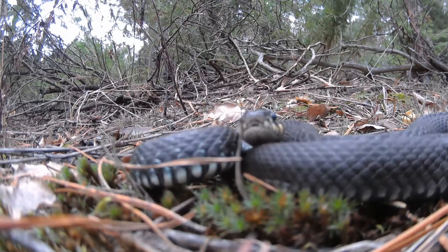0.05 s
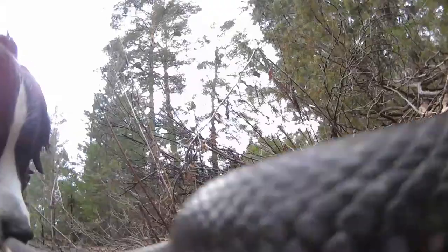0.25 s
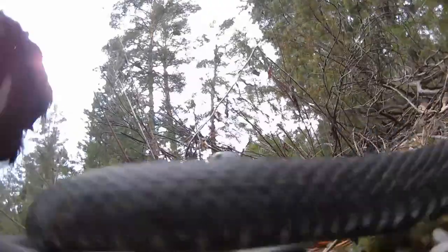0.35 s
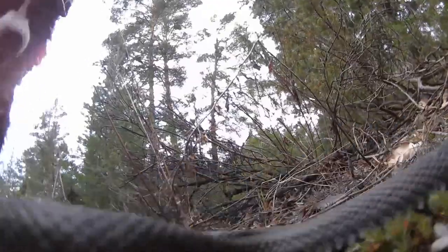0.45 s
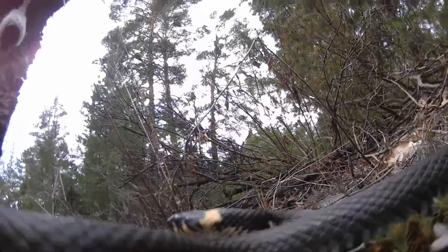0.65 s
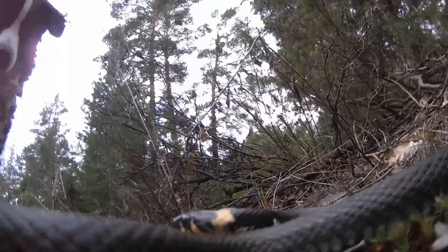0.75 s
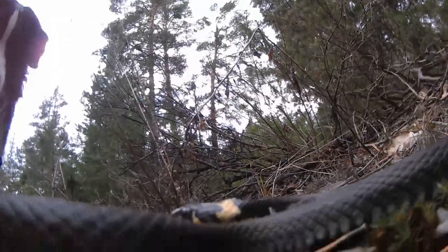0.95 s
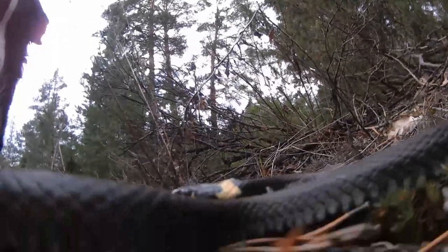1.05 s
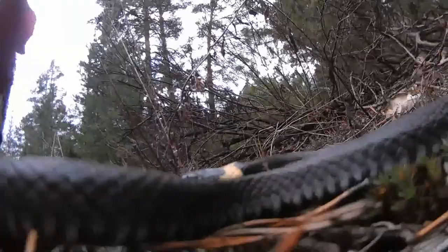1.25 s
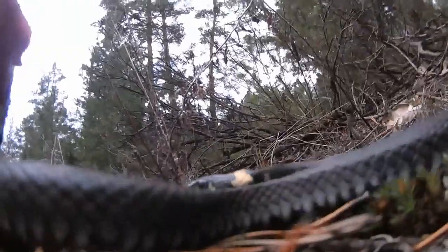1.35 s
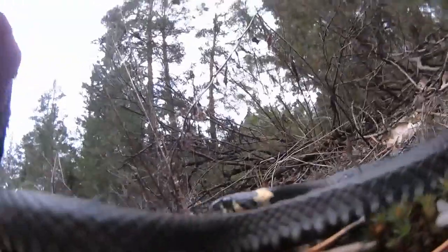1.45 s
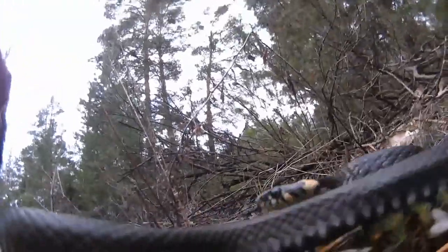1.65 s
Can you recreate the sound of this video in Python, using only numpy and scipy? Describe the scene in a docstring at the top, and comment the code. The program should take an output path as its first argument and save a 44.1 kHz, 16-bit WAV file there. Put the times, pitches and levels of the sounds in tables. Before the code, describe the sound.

A snake suddenly brushes against a microphone lying on the ground in a quiet forest, with a rasping scrape, bumps and a rumble. Softer slithering follows, with small snaps of dry needles, one light knock and a fading hiss.

```python
"""Quiet forest air. Then, abruptly, a snake is heard lunging past a small camera on the ground:
its scales scrape the case and its weight makes a low rumble, while a soft hiss from its throat and
the rub of its belly start underneath. The case is knocked several times and judders once.
As the scrape dies away, the snake slides on over dry needles, which crackle and now and then snap.
One more light knock comes midway, and the long hiss rises in pitch and fades."""
import sys
import numpy as np
from scipy import signal
from scipy.fft import rfft, irfft
from scipy.io import wavfile

SR = 44100
rng = np.random.default_rng(int(sys.argv[2]) if len(sys.argv) > 2 else 0)


def transcribe(signal):
    """Save signal, clipped to [-1, 1], as a 16-bit WAV file at the path in sys.argv[1]."""
    frames = np.atleast_2d(signal).T
    limited = np.clip(frames, -1, 1)
    pcm = np.round(limited * 32767).astype(np.int16)
    wavfile.write(sys.argv[1], SR, pcm)


N = 74970  # 1.7 s

# tone of the forest air: f/Hz, level/dB
AIR_TONE = [(20, 12.5), (45, -0.5), (100, -2), (180, -3.5), (280, -7.5), (380, -11), (550, -9.5),
            (750, -15), (1000, -16), (1250, -24.5), (1800, -28.5), (4000, -33), (8000, -37)]
# scales scraping the case: t/s, rasp level/dB, sizzle level/dB
SCRAPE_LEVELS = [(0.231, -42, -49.5), (0.243, -43, -46), (0.262, -40.5, -55), (0.28, -36.5, -52),
                 (0.296, -26.5, -42), (0.322, -33.5, -49.5), (0.345, -44.5, -52.5), (0.38, -40.5, -54.5),
                 (0.41, -49.5, -59), (0.46, -64.5, -78)]
# tone of the scrape's low rasp: f/Hz, level/dB
RASP_TONE = [(30, -10), (90, 0), (250, 3.5), (450, 0.5), (720, -4), (1050, -5), (1600, -7), (2100, -19),
             (3000, -39), (8000, -51.5)]
# tone of the scrape's high sizzle: f/Hz, level/dB
SIZZLE_TONE = [(800, -13.5), (1800, -8.5), (2500, 2), (3100, -2), (3900, -1.5), (4700, -10.5),
               (6000, -15.5), (8000, -22.5)]
# the body pushing on the case: t/s, level/dB
PUSH_LEVELS = [(0.231, -41.5), (0.255, -37), (0.28, -37), (0.32, -35.5), (0.36, -42.5), (0.41, -45),
               (0.47, -53), (0.56, -57), (0.66, -53.5), (0.75, -51.5), (0.87, -53), (0.95, -49), (1.0, -48),
               (1.11, -49), (1.16, -56), (1.26, -60), (1.32, -65), (1.45, -70), (1.53, -57), (1.59, -56),
               (1.645, -49), (1.7, -54)]
# tone of that push: f/Hz, level/dB
RUMBLE_TONE = [(20, -7), (40, -1), (70, 1.5), (130, 2.5), (200, -16), (350, -22), (1000, -56)]
# the hiss and the pitch the throat rings at: t/s, level/dB, f/Hz
HISS_SHAPE = [(0.33, -55.5, 1700), (0.48, -55.5, 1660), (0.68, -61, 1820), (0.82, -56.5, 1766),
              (0.93, -58, 1870), (1.1, -58, 1940), (1.17, -55.5, 2020), (1.23, -59, 2110), (1.3, -63, 2290),
              (1.39, -71, 2570), (1.46, -72.5, 2710)]
# sliding over needles: t/s, relative rub level/dB, relative crackle level/dB
SLIDE_LEVELS = [(0.42, -58.5, -60.5), (0.44, -61, -69), (0.475, -51.5, -59), (0.515, -50, -62.5),
                (0.56, -54, -73), (0.61, -55.5, -64.5), (0.68, -55, -71.5), (0.745, -52, -67),
                (0.82, -57.5, -64), (0.92, -55, -64.5), (0.99, -51.5, -61), (1.05, -52.5, -66),
                (1.12, -50, -60.5), (1.18, -56.5, -66.5), (1.28, -53.5, -65.5), (1.34, -56.5, -71),
                (1.42, -56, -68.5), (1.46, -57, -75), (1.53, -53.5, -77), (1.57, -55.5, -76),
                (1.64, -53.5, -62.5), (1.7, -53, -66)]
# tone of the belly rubbing: f/Hz, level/dB
RUB_TONE = [(60, -6), (170, -1), (260, 0), (380, -0.5), (520, -2), (700, -5.5), (900, -7.5), (1200, -11.5),
            (1700, -15), (2600, -26.5), (8000, -39.5)]
# tone of the needles crackling: f/Hz, level/dB
CRACKLE_TONE = [(500, -23), (1300, 7), (2200, 4.5), (3300, 4), (4800, 1), (6200, 2), (8000, -9.5)]
# knocks on the case: t/s, level/dB
CASE_KNOCKS = [(0.269, -32), (0.2834, -31.5), (0.2917, -30.5), (0.3003, -28), (0.3066, -31), (0.319, -27),
               (0.335, -33.5), (0.783, -35.5), (0.7872, -36.5)]
# notes the case rings with: f/Hz, relative level/dB, fade time/s (to fall by 60 dB)
CASE_NOTES = [(185, 0, 0.037), (256, -7, 0.052), (415, -3, 0.023), (794, -3, 0.018), (1000, -9.5, 0.011),
              (1900, -7.5, 0.013), (3600, -19, 0.0035), (6660, -21, 0.0033)]
# single needles snapping: t/s, peak level/dB, f/Hz
NEEDLE_SNAPS = [(0.4588, -46.5, 3800), (0.6042, -42.5, 2470), (0.63, -48.5, 5460), (0.848, -51.5, 5970),
                (0.9792, -45, 3500), (1.1057, -42.5, 3460), (1.127, -46, 4950), (1.3642, -44, 2540),
                (1.378, -51, 2670), (1.388, -53, 3170), (1.55, -47, 1380), (1.6037, -43.5, 1190),
                (1.632, -47, 3380), (1.684, -44, 2430)]

CUT_IN_S = 0.2286  # the snake's scrape, rumble, hiss and slide start abruptly


def gain_of(db):
    """Turns decibels into a number to multiply by."""
    return 10 ** (np.asarray(db) / 20)


def evened(x):
    """Scales a signal to an average strength (rms) of 1."""
    return x / np.sqrt(np.mean(x ** 2) + 1e-20)


def curve(table, column=1):
    """Joins a column's points over time, holding the first and last values."""
    columns = np.transpose(table)
    return np.interp(np.arange(N) / SR, columns[0], columns[column])


def after(start_s, rise_s):
    """Fades from 0 to 1, beginning at start_s."""
    return np.clip((np.arange(N) / SR - start_s) / rise_s, 0, 1)


def add(mix, start_s, sound):
    """Mixes a sound in at start_s."""
    part = mix[round(start_s * SR):][:len(sound)]
    part += sound[:len(part)]


def coloured(x, tone):
    """Shapes the lows and highs of x by a tone table, at strength 1."""
    hz, db = np.transpose(tone)
    shape_db = np.interp(np.log(np.fft.rfftfreq(N, 1 / SR) + 1), np.log(hz), db)
    return evened(irfft(rfft(x) * gain_of(shape_db), N))


def grains(per_s, spread_db):
    """Tiny slips at random moments, a few larger than the rest."""
    size = gain_of(spread_db * np.minimum(rng.exponential(1, N), 4))
    direction = rng.choice([-1, 1], N)
    happens = rng.random(N) < per_s / SR
    return evened(size * direction * happens)


def drift(hz):
    """A smooth random wobble, mostly slower than hz, at strength 1."""
    keep_slow = np.exp(-(np.fft.rfftfreq(N, 1 / SR) / hz) ** 2)
    return evened(irfft(rfft(rng.standard_normal(N)) * keep_slow, N))


def resonate(x, hz, width_hz):
    """Makes x ring around a pitch, which may move."""
    turn = np.exp(2j * np.pi * np.cumsum(hz * np.ones(len(x))) / SR)
    decay = np.exp(-np.pi * width_hz / SR)
    return 2 * (turn * signal.lfilter([1 - decay], [1, -decay], x / turn)).real


def forest_air():
    """The air makes a quiet, steady, low noise."""
    return gain_of(-49) * coloured(rng.standard_normal(N), AIR_TONE)


def scale_scrape():
    """Scales catch and slip on the case: a rasp with a sizzle on top."""
    slips = grains(per_s=2200, spread_db=2.5)
    rasp = coloured(slips, RASP_TONE) * gain_of(curve(SCRAPE_LEVELS))
    sizzle = coloured(slips, SIZZLE_TONE) * gain_of(curve(SCRAPE_LEVELS, column=2))
    fade_out = 1 - after(SCRAPE_LEVELS[-1][0], 0.051)
    return (rasp + sizzle) * fade_out


def body_push():
    """The body's weight rumbles through the ground and the case."""
    return coloured(rng.standard_normal(N), RUMBLE_TONE) * gain_of(curve(PUSH_LEVELS))


def throat_hiss():
    """Air rushes through the snake's throat, which rings at a slowly rising pitch."""
    hz, width_hz = curve(HISS_SHAPE, column=2), 730
    breath = resonate(rng.standard_normal(N), hz, width_hz)
    breath = resonate(breath, hz, width_hz)  # a second pass narrows the hiss
    return evened(breath) * gain_of(curve(HISS_SHAPE) + drift(hz=50))


def belly_slide():
    """The belly rubs over the ground and dry needles crackle in clumps."""
    slips = grains(per_s=3000, spread_db=2.5) * gain_of(1.12 * drift(hz=44.7))
    rub = coloured(slips, RUB_TONE) * gain_of(curve(SLIDE_LEVELS) - 0.5)
    crackle = coloured(slips, CRACKLE_TONE) * gain_of(curve(SLIDE_LEVELS, column=2) + 1.5)
    return rub + crackle


def case_knocks():
    """Each knock briefly rings all the notes of the case, each a little out of tune."""
    out, t = np.zeros(N), np.arange(SR // 10) / SR
    for start_s, knock_db in CASE_KNOCKS:
        for hz, note_db, fade_s in CASE_NOTES:
            note = np.sin(2 * np.pi * hz * rng.uniform(0.9, 1.05) * t)
            add(out, start_s, note * gain_of(knock_db + note_db - 60 * t / fade_s))
    return out


def case_judder():
    """At the hardest contact the case shakes unevenly near its lowest note, buzzing a little."""
    peak_s, peak_db, pitch_hz = 0.298, -18.5, 174
    rise_db_per_s, fall_db_per_s = 433, 512
    t = np.arange(N) / SR - peak_s
    level_db = peak_db + np.minimum(t * rise_db_per_s, -t * fall_db_per_s)
    phase = 2 * np.pi * np.cumsum(pitch_hz * (1 + 0.13 * drift(hz=148))) / SR
    shake = np.sin(phase) + gain_of(-14.5) * np.sin(2 * phase)  # the octave above adds buzz
    flutter_db = 1.44 * drift(hz=100)
    fade_in = after(peak_s - 0.0223, rise_s=0.0018)
    return evened(shake) * gain_of(level_db + flutter_db) * fade_in


def needle_snaps():
    """A dry needle snaps with a tick: a tiny burst of noise around one pitch."""
    out, t = np.zeros(N), np.arange(SR // 10) / SR
    decay_s = 0.0018
    for start_s, peak_db, hz in NEEDLE_SNAPS:
        burst = rng.standard_normal(len(t)) * np.exp(-t / decay_s)
        snap = resonate(burst, hz, width_hz=0.55 * hz)
        snap = resonate(snap, hz, width_hz=hz)
        add(out, start_s, gain_of(peak_db) * snap / abs(snap).max())
    return out


def scene():
    """Forest air alone, then the snake's sounds cut in abruptly, in one channel."""
    snake = scale_scrape() + case_judder() + body_push() + throat_hiss() + belly_slide()
    snake *= after(CUT_IN_S, rise_s=0.0008)
    return (forest_air() + snake + case_knocks() + needle_snaps())[None]


def record(dry):
    """The camera loses the treble above 8100 Hz."""
    treble_cut = signal.firwin(255, 8100, window=("kaiser", 8), fs=SR)
    return signal.oaconvolve(dry, treble_cut[None], "same")


dry = scene()
out = record(dry)
transcribe(out)
```